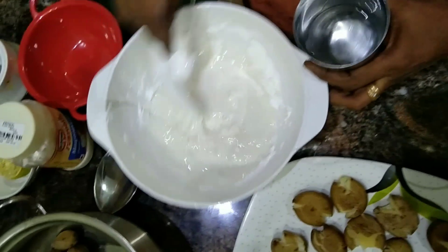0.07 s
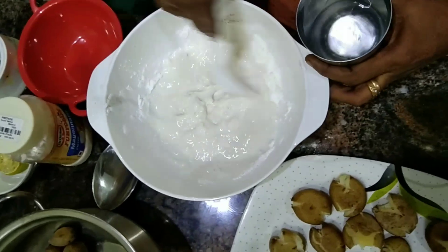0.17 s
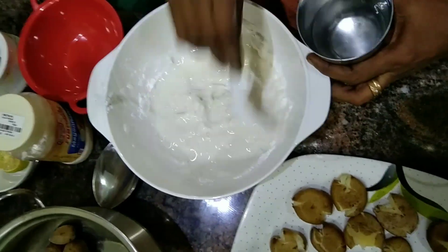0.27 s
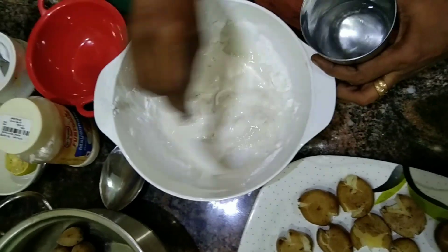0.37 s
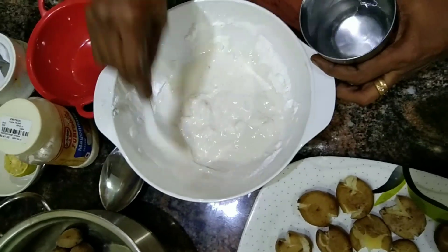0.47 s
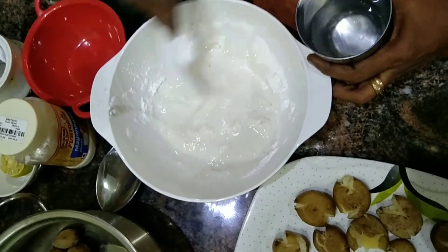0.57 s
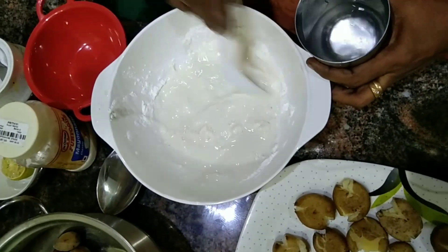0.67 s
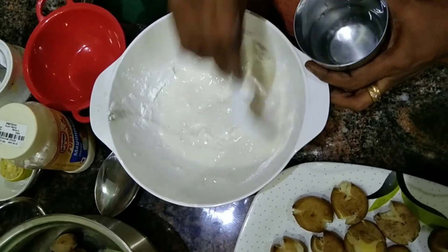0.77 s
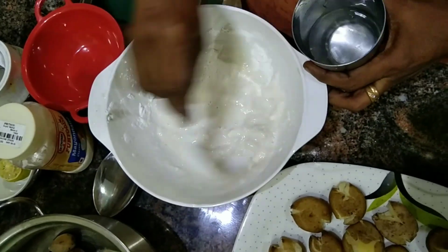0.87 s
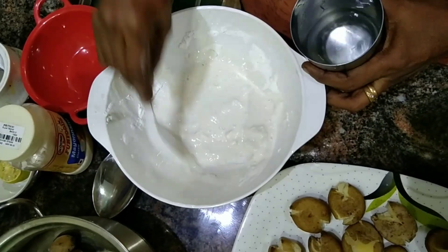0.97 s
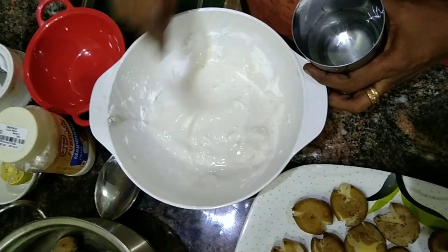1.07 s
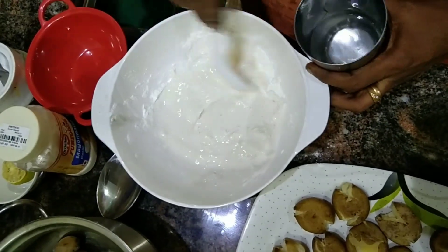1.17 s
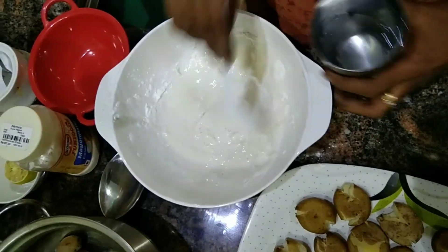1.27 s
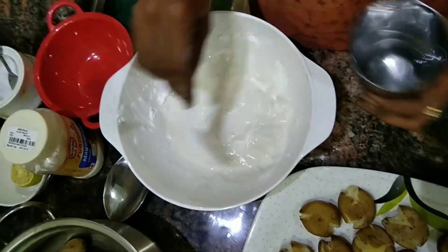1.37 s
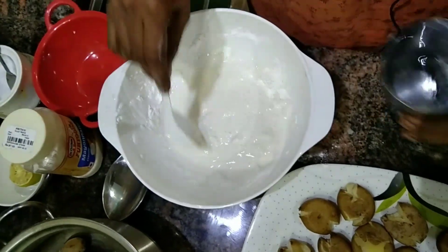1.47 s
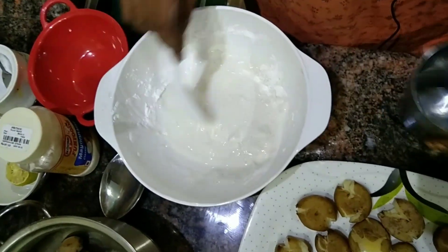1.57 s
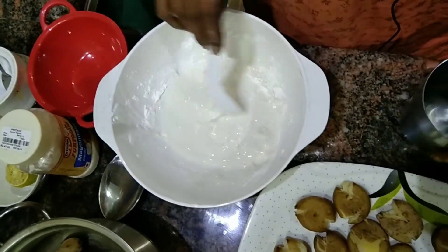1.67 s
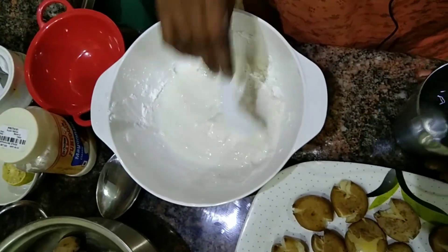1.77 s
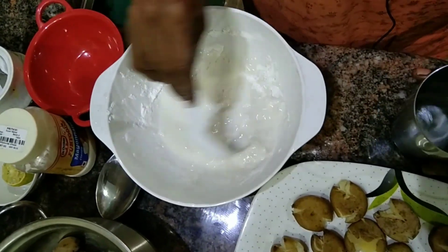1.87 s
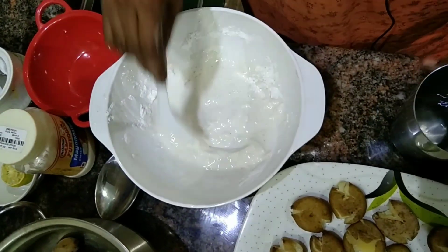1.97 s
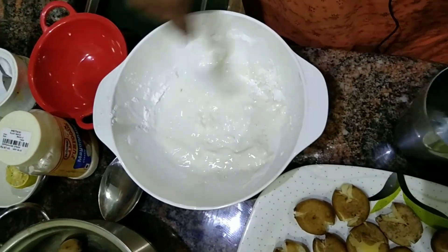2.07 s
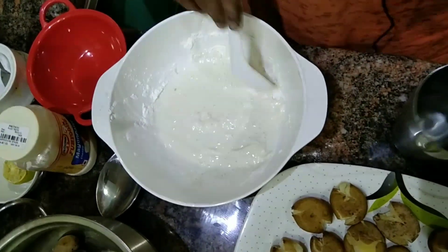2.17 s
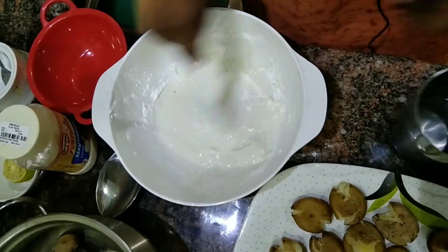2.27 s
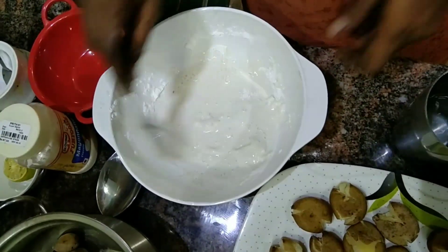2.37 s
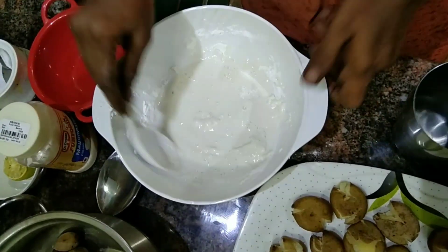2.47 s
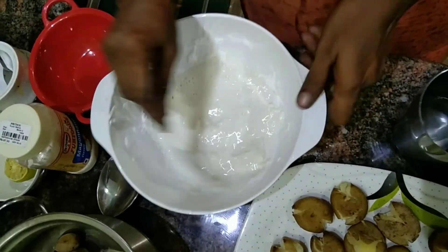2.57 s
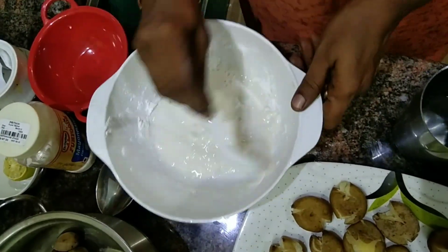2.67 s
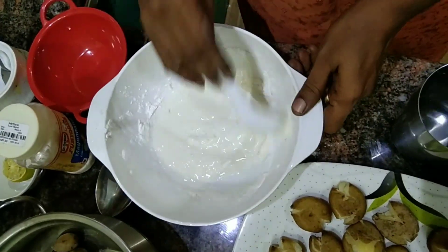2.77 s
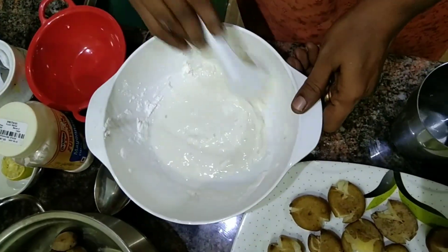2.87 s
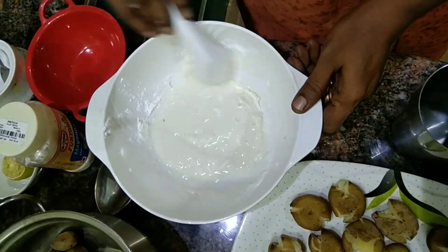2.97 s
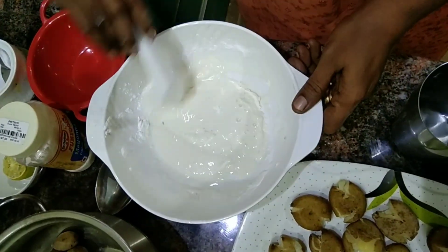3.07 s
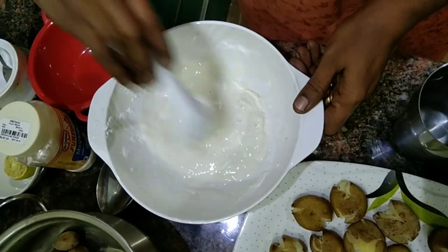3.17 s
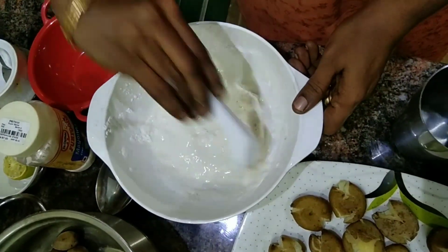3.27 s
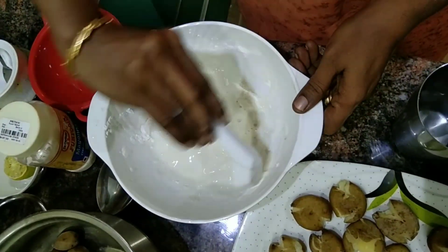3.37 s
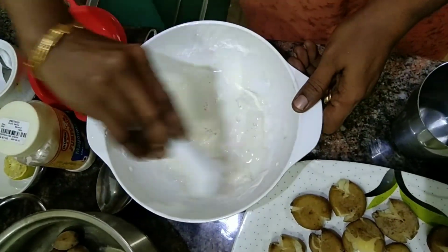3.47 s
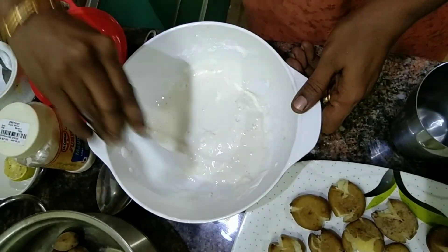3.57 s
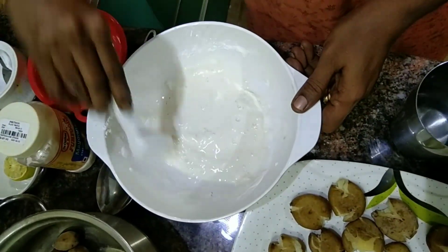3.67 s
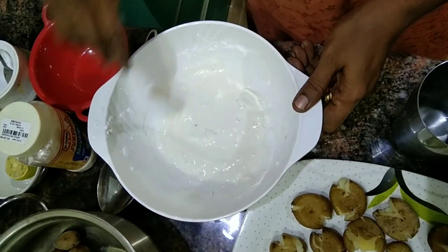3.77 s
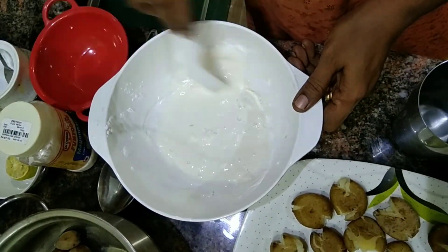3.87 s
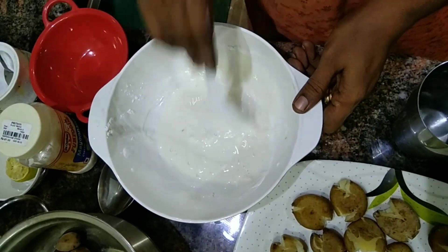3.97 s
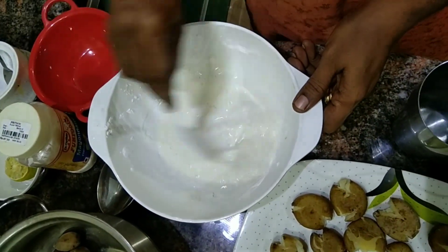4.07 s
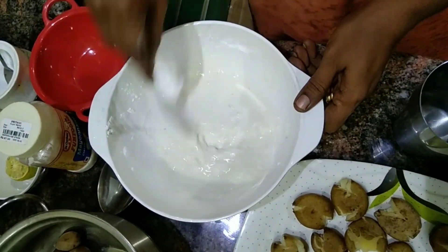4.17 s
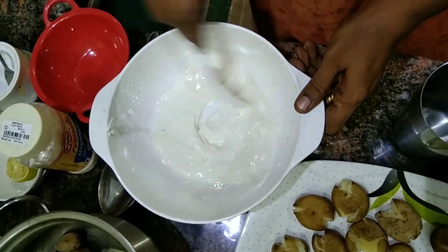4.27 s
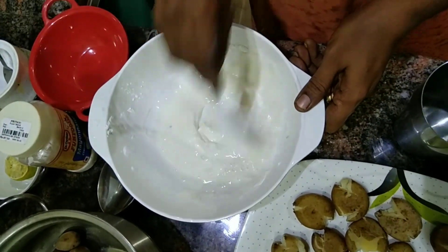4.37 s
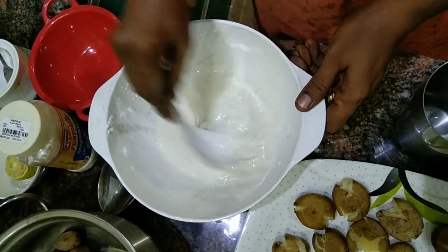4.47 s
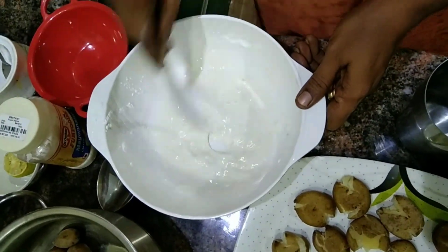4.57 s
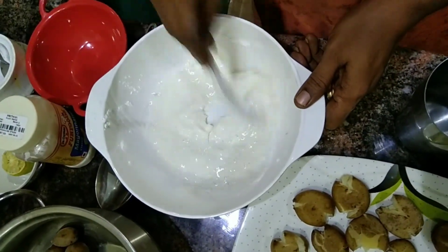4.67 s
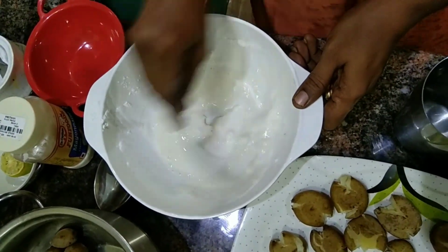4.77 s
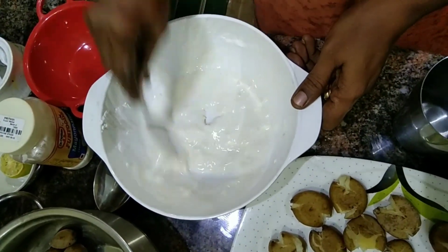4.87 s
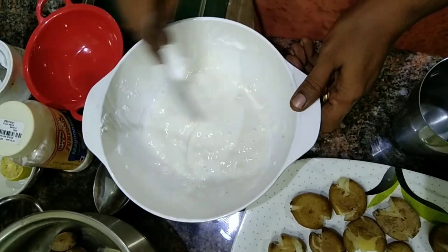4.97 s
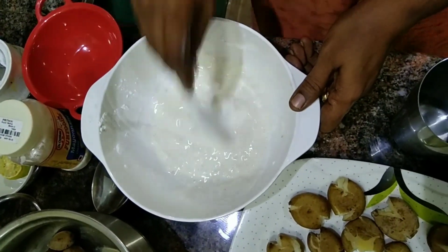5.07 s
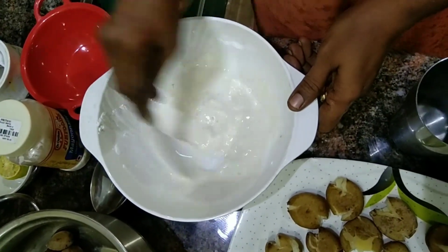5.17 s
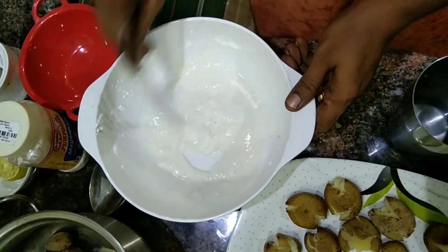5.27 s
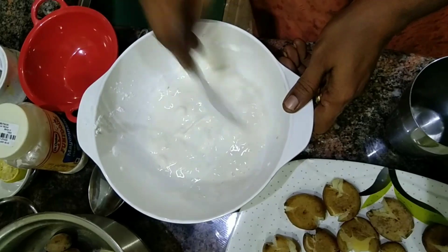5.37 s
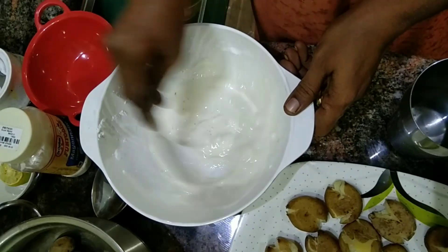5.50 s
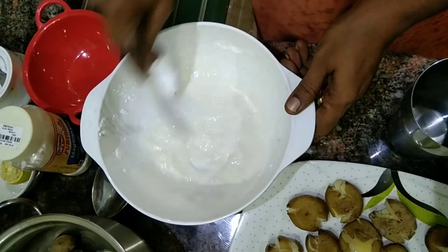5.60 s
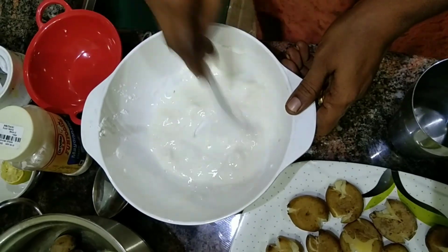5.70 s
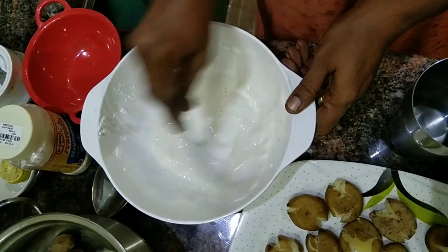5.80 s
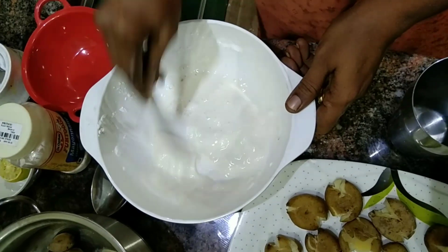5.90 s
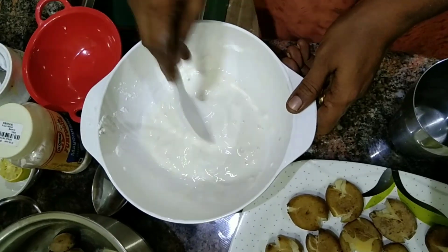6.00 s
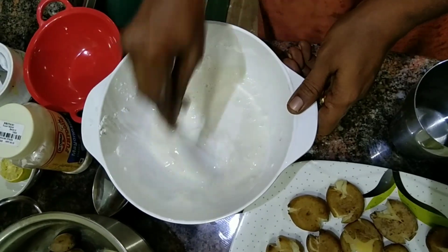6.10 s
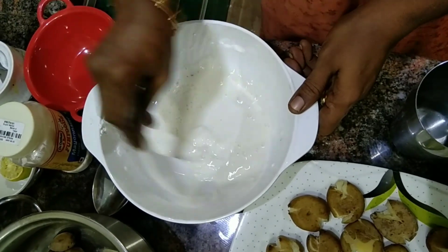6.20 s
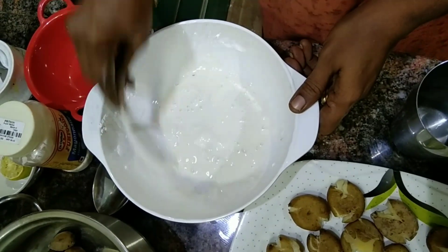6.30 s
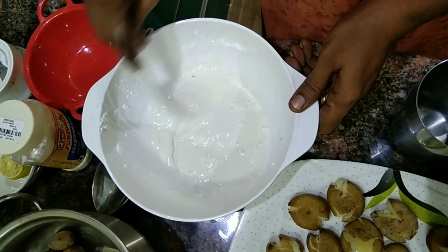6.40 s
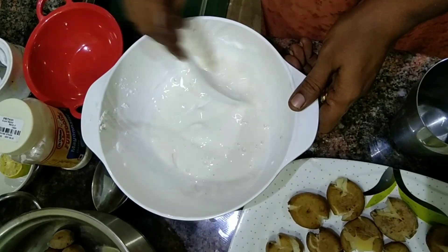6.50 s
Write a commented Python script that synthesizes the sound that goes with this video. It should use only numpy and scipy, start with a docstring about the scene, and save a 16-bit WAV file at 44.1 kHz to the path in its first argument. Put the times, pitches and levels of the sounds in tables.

```python
"""A kitchen hums and a power supply whines near 8 kHz, pulsing at twice the mains frequency: sines over shaped noise.
A plastic spoon stirs thin batter in a plastic bowl on a stone counter: its taps and scrapes excite the bowl's modes,
the batter clicks and slops as chirped pops and patchy noise. A pot is nudged, then a steel cup is set down and clinks:
damped modes plus noise bursts and impulses. Each hit gets a reverberant tail of about half a second."""
import sys
import numpy as np
from scipy import signal
from scipy.fft import rfft, irfft, next_fast_len
from scipy.io import wavfile
from scipy.ndimage import uniform_filter1d, map_coordinates

SR = 44100
rng = np.random.default_rng(int(sys.argv[2]) if len(sys.argv) > 2 else 0)


def inscribe(sig):
    """Save sig as 16-bit PCM at rate SR to the path in sys.argv[1].

    A 1-D sig is mono; a 2-D sig holds one channel per row.
    Samples are clipped to [-1, 1] before scaling.
    """
    pcm = np.round(np.clip(np.atleast_2d(sig).T, -1, 1) * 32767)
    wavfile.write(sys.argv[1], SR, pcm.astype(np.int16))


N = 288414
T = np.arange(N) / SR


def amp(db):
    """dB to amplitude."""
    return 10 ** (np.asarray(db) / 20)


def unit(x):
    """Scales to rms 1."""
    return x / np.sqrt(np.mean(x ** 2) + 1e-20)


def peak(x):
    """Scales to peak 1."""
    return x / np.abs(x).max()


def along(points, hz):
    """Interpolates (Hz, value) points on a log-frequency axis."""
    f, v = np.transpose(points)
    return np.interp(np.log(hz + 1), np.log(f + 1), v)


def wobble(knots_per_s):
    """Smooth random curve through normal-distributed knots."""
    knots = rng.standard_normal(int(N * knots_per_s / SR) + 4)
    return map_coordinates(knots, [T * knots_per_s])


def filtered(x, response):
    """Applies a complex response of frequency to x."""
    m = next_fast_len(x.shape[-1] + 8192)
    spectrum = rfft(x, m) * response(np.fft.rfftfreq(m, 1 / SR))
    return irfft(spectrum, m)[..., :x.shape[-1]]


def noise(spectrum, size=N):
    """Coloured noise, rms 1."""
    return unit(filtered(rng.standard_normal(size), lambda hz: amp(along(spectrum, hz))))


def ringing(modes, t, attack_s):
    """Damped modes (Hz, dB, t60 s), each strength scattered at random, with a soft onset."""
    chance_db = rng.normal(0, 1.5, len(modes))
    total = 0
    for (hz, db, t60_s), scatter_db in zip(modes, chance_db):
        total = total + amp(db + scatter_db - 60 * t / t60_s) * np.sin(2 * np.pi * hz * t)
    return (1 - np.exp(-t / attack_s)) * total


def puff(spectrum, t, t60_s):
    """Decaying burst of coloured noise, peak 1."""
    envelope = amp(-60 * t / t60_s) * (1 - np.exp(-t / 0.001))
    return peak(noise(spectrum, size=len(t)) * envelope)


# room decay: (frequency [Hz], t60 [s])
ROOM_DECAY = [(150, 0.13), (700, 0.65), (2000, 0.41), (6000, 0.44), (14000, 0.61)]


def add(track, start_s, sound, room_db):
    """Mixes in a sound with a fresh noise tail that decays at its own rate per frequency."""
    hz, t, z = signal.stft(rng.standard_normal(SR * 3 // 5), SR, nperseg=256)
    decay = amp(-60 * t / np.abs(along(ROOM_DECAY, hz))[:, None])
    tail = signal.istft(z * decay, SR, nperseg=256)[1]
    wet = amp(room_db) * signal.fftconvolve(sound, tail / np.linalg.norm(tail))
    i = round(start_s * SR)
    track[i:i + len(sound)] += sound[:len(track) - i]
    i += round(.006 * SR)  # the first walls answer a little later
    track[i:i + len(wet)] += wet[:max(len(track) - i, 0)]


# kitchen air spectrum: (frequency [Hz], density [dB per Hz])
AIR_SPECTRUM = [(15, -44.5), (25, -42.5), (48, 5.5), (102, -1), (157, -5), (185, -8), (309, -6.5),
                (489, -10.5), (1130, -17.5), (1940, -20), (2760, -23), (3160, -23.5), (6210, -23),
                (8140, -17), (16000, -33)]
# appliance hum: (frequency [Hz], level before wavering [dB rms])
HUM_TONES = [(55, -86), (107.7, -76.5), (193.8, -71.5)]
# power-supply whine: (frequency [Hz], level before pulsing and wavering [dB rms])
WHINE_TONES = [(7305, -85), (7781, -71), (8257.8, -70.5), (8734, -84)]
AIR_DB, PULSE_HZ = -62, 100.05


def kitchen():
    """Air noise, a wavering hum and a whine switched on at each mains half-wave."""
    air = amp(AIR_DB + 0.23 * wobble(1.64)) * noise(AIR_SPECTRUM)
    hum = np.zeros(N)
    for hz, db in HUM_TONES:
        level = amp(db + 3 + 2.5 * wobble(9))  # +3 dB: rms to peak
        hum += level * np.sin(2 * np.pi * hz * T + 1.6 * wobble(14))
    whine = np.zeros(N)
    for hz, db in WHINE_TONES:
        level = amp(db + 3 + wobble(3))
        whine += level * np.sin(2 * np.pi * hz * T + .7 * wobble(2))
    gate = 1 + 1.05 * np.cos(2 * np.pi * PULSE_HZ * (T - .0035))
    return air + hum + gate * whine


def bubble(t, hz, t60_s, snap_db):
    """An air pocket pops: a damped tone rising as it closes and a snap around it, the harder the broader."""
    onset = 1 - np.exp(-t / 0.0015)
    tone = np.sin(2 * np.pi * hz * t * (1 + 5 * t)) * amp(-60 * t / max(t60_s, .002)) * onset
    edge = [(hz / 6, -45), (hz / 1.6, -4), (hz, 0), (1.8 * hz, -4),
            (3.2 * hz, 1.5 * snap_db - 14), (10 * hz, 3 * snap_db - 36)]
    # the microphone dulls the top of each snap
    snap = filtered(puff(edge, t, 0.0071), lambda f: 1 / (1 + 1j * f / 9000) ** 2)
    return tone + amp(snap_db) * snap


# wet clicks: (time [s], level [dB], pitch [Hz], snap against tone [dB])
BATTER_CLICKS = [(0.063, -47, 11500, 11), (0.0722, -43.5, 1300, -0.5), (0.141, -40, 2100, 1.5),
                 (0.365, -55, 2885, 8), (0.3887, -47, 2800, -2), (0.425, -48, 4048, -4),
                 (0.472, -43.5, 1470, 0), (0.7221, -41, 5100, 9), (0.817, -40, 10000, -5),
                 (0.91, -43, 2690, 6), (0.9676, -44.5, 4240, -4.3), (1.0443, -49, 1380, -17),
                 (1.205, -42, 2260, -10), (1.2626, -51, 2230, 2), (1.2735, -45, 5650, -1),
                 (1.3338, -46.5, 4130, 2), (1.3702, -47.5, 6244, 5), (2.0799, -48.5, 6700, 2),
                 (2.134, -46.5, 7060, 4), (2.382, -52, 1450, 5), (2.4449, -50, 7600, 9.5),
                 (3.164, -48, 1950, -1), (3.3324, -41, 2720, -11.5), (3.5252, -48, 4890, 7.5),
                 (3.549, -33.5, 9250, 3.5), (3.5606, -42.5, 4900, 3), (4.2096, -41, 1560, -8),
                 (4.2977, -44, 2110, 0), (4.3277, -51, 2100, 4), (4.395, -27.5, 3830, -14),
                 (4.408, -44, 4200, 6), (4.7492, -42, 2070, -19), (4.7634, -43, 4000, 8),
                 (4.8273, -51, 1880, -9), (4.8399, -42.5, 2120, 1.5), (4.901, -46.5, 1520, 0),
                 (5.003, -49, 3020, -3), (5.0236, -52, 1520, -2), (5.1462, -50, 2420, -4),
                 (5.2161, -43, 2400, 10.5), (5.285, -44.5, 1540, 3), (5.3445, -43, 5100, 8),
                 (5.438, -46, 3870, 5), (5.5064, -35, 2570, -5), (5.515, -44, 2713, 10),
                 (5.539, -37.5, 4870, 3), (5.5705, -34, 5540, -3), (5.5817, -42, 1530, 6),
                 (5.6824, -48, 3000, -1), (5.755, -40.5, 1440, 2), (5.8126, -19.5, 2610, -5.5),
                 (5.8216, -29, 3110, -10), (5.8333, -41, 3488, -13), (5.849, -26, 6440, -2),
                 (5.925, -47, 1420, -2), (6.0303, -36.5, 10500, 4), (6.0419, -35.5, 2140, -2),
                 (6.2104, -50.5, 1530, 6.5), (6.2524, -55.5, 1380, 9)]
POP_T60_S, POP_SHORTENS = 0.019, 0.69  # t60 at 2 kHz; falls with this power of pitch


def clicks():
    """The batter's loudest pops, each a closing air pocket."""
    out, t = np.zeros(N), np.arange(SR // 16) / SR
    for start_s, db, hz, snap_db in BATTER_CLICKS:
        t60_s = POP_T60_S * (2000 / hz) ** POP_SHORTENS
        add(out, start_s, amp(db) * bubble(t, hz, t60_s, snap_db), room_db=-10.5)
    return out


# bowl modes: (frequency [Hz], width [Hz], level [dB])
BOWL_MODES = [(494.4, 55.5, 3), (592, 59, 5), (672.3, 70, 10.5), (800, 31.8, -2), (860.5, 40.3, 4.5),
              (894, 37, -6), (1013, 28, -10), (1426, 53, 1.5), (1990, 230, -9)]
# spoon on bowl: (time [s], body peak [dB], spot pitch [Hz], hardness: click against body [dB])
SPOON_TAPS = [(0.066, -37.5, 830, -10.5), (0.128, -29.5, 620, -28), (0.14, -39, 660, -34),
              (0.383, -39, 660, -32), (0.399, -52, 610, -13), (0.583, -45, 635, -27),
              (0.791, -45.5, 700, -14), (0.91, -50, 680, -21), (0.954, -40, 690, -24),
              (1.086, -49, 678, -22), (2.651, -13, 890, -6.5), (2.667, -11.5, 610, -10.5),
              (2.682, -20.5, 614, -18), (3.497, -47.5, 680, -30), (3.522, -40.5, 686, -26),
              (3.554, -46.5, 700, 1.5), (3.719, -34, 864, -14), (3.727, -25.5, 940, -10.5),
              (3.739, -24.5, 670, 4), (3.751, -34, 633, 16), (3.76, -21, 990, -1.5), (3.901, -33, 970, -24),
              (3.924, -34, 830, -29), (4.281, -31, 600, -23), (4.65, -45, 673, -10), (4.844, -45, 676, -16),
              (4.95, -35.5, 690, -29), (5.347, -44, 660, -10), (5.782, -34, 700, -23),
              (6.04, -37.5, 562, -12)]
# bowl base rocking on the counter: (time [s], level [dB])
BASE_ROCKS = [(0.128, -49), (0.383, -54), (0.954, -55), (2.651, -23.5), (4.281, -64), (4.651, -50),
              (4.95, -55)]
CLICK_T60_S, KNOCK_T60_S = .018, .03
KNOCK_DB = -0.5  # mid part of a hard contact, against its click


def taps():
    """A soft push rings the batter-damped bowl, most near the spot's pitch; harder contact adds a click."""
    out, t = np.zeros(N), np.arange(SR // 8) / SR
    knock_spectrum = [(250, -98), (600, -2), (1100, -5.5), (1500, -16.5), (2500, -19), (3500, -20), (8000, -66)]
    click_spectrum = [(1500, -16), (3800, 4), (8000, 3.0), (12000, -14.0), (16000, -41)]
    for start_s, db, spot_hz, hard_db in SPOON_TAPS:
        modes = []
        for hz, width_hz, level_db in BOWL_MODES:
            off_spot_db = 12 * abs(np.log2(hz / spot_hz))
            modes.append((hz, level_db - off_spot_db, 2.2 / width_hz))  # t60 = 2.2 / width
        body = peak(ringing(modes, t, 0.002))
        knock = amp(hard_db + KNOCK_DB) * puff(knock_spectrum, t, KNOCK_T60_S)
        click = amp(hard_db) * puff(click_spectrum, t, CLICK_T60_S)
        add(out, start_s, amp(db) * (body + knock + click), room_db=-7)
    for start_s, db in BASE_ROCKS:
        boom = amp(db - 60 * t / 0.027) * np.sin(2 * np.pi * 250 * t)
        boom *= 1 + 0.25 * np.cos(2 * np.pi * 70 * t)  # makes three low tones
        add(out, start_s, boom, room_db=-5)
    return out


def bowl_response(f):
    """The bowl's causal response: resonances of alternating sign."""
    total = 0
    for k, (hz, width_hz, db) in enumerate(BOWL_MODES):
        total = total + (-1) ** k * amp(db) * 1j * f * width_hz / (hz * hz - f * f + 1j * f * width_hz)
    return total


def grains(count, hz, spread, cycles, size_db):
    """Many tiny damped pops at random moments around a pitch curve, rms 1."""
    u, t = rng.random((count, 2)), np.arange(512) / SR
    start = (u[:, :1] * N).astype(int)
    f = np.clip(hz[start] * np.exp(spread * rng.standard_normal((count, 1))), 300, 15000)
    life = t * f / cycles
    size = amp(-size_db * np.log(u[:, 1:] + .02))  # the offset caps the largest pops
    pops = size * np.sin(2 * np.pi * f * t) * life * np.exp(-life)
    return unit(np.bincount((start + np.arange(512)).ravel(), pops.ravel(), N + 512)[:N])


def patchy(spectrum, depth_db, bins, frames):
    """Coloured noise whose level comes in small patches of time and pitch, rms 1."""
    z = signal.stft(noise(spectrum), nperseg=256)[2]
    field = uniform_filter1d(rng.standard_normal(z.shape), size=bins, axis=0)
    field = uniform_filter1d(field, size=frames, axis=1)
    return unit(signal.istft(z * amp(depth_db * unit(field)), nperseg=256)[1][:N])


# spoon sweeps: (start [s], hold [s], slop level [dB], wall rub level [dB], air pocket pitch [Hz])
SPOON_STROKES = [(0.1, 0.037, -66.5, -67, 3700), (0.357, 0.018, -65, -63, 6070),
                 (0.638, 0.15, -69.5, -66.5, 4550), (0.79, 0.094, -89, -74, 5830),
                 (0.93, 0.057, -76, -63, 5080), (1.101, 0.053, -60.5, -63.5, 2615),
                 (2.67, 0.23, -80, -52, 5740), (2.858, 0.2, -66.5, -58.5, 6040),
                 (3.466, 0.042, -72, -59.5, 2265), (3.54, 0.04, -65.5, -78, 5700),
                 (3.665, 0.027, -55, -55, 4680), (3.75, 0.12, -63, -49.5, 6150),
                 (3.896, 0.065, -77, -54.5, 4200), (4.274, 0.04, -61, -70, 6000),
                 (4.373, 0.033, -67.5, -79, 4240), (4.631, 0.12, -64, -69, 4780),
                 (4.819, 0.05, -62.5, -60, 3300), (4.95, 0.096, -67, -62.5, 4930),
                 (5.16, 0.12, -72.5, -67, 2170), (5.308, 0.057, -62.5, -65.5, 5900),
                 (5.395, 0.09, -66, -67.5, 3900), (5.514, 0.18, -62.5, -63, 5970),
                 (5.696, 0.032, -55, -62, 4980), (5.774, 0.073, -62.5, -60, 2890),
                 (5.879, 0.061, -65.5, -61.5, 2710), (6.02, 0.031, -73, -59.5, 2670),
                 (6.168, 0.066, -75, -63.5, 2820), (6.42, 0.059, -59.5, -64, 4200)]
ATTACK_S, SLOP_T60_S, RUB_T60_S = 0.036, 0.23, 0.24


def sweeps(level_db, t60_s):
    """Gain of all sweeps, power-summed: attack, hold, release."""
    start, hold = np.transpose(SPOON_STROKES)[:2, :, None]
    age = T[::64] - start
    release_s = np.clip(age - ATTACK_S - hold, 0, 1)
    gain = np.clip(age / ATTACK_S, 0, 1) * amp(level_db[:, None] - 60 * release_s / t60_s)
    return np.interp(T, T[::64], np.sqrt(np.sum(gain ** 2, axis=0)))


# batter slop spectrum: (frequency [Hz], density [dB per Hz])
SLOP_SPECTRUM = [(500, -79), (1300, -3.5), (2300, 3), (4500, 3), (7000, -4), (10000, -34.5)]
# batter fizz spectrum: (frequency [Hz], density [dB per Hz])
FIZZ_SPECTRUM = [(4000, -8), (7000, 12.5), (10000, 10.5), (13000, -2), (16000, -46)]
FIZZ_DB, FIZZ_DB_PER_OCTAVE = -2, 2  # fizz against slop at a 4 kHz pocket; finer pockets fizz more
SINK_OCTAVES_PER_S, GRIT_DB = 4.17, 4  # pockets grow and drop in pitch; the drag is uneven


def stroke():
    """The spoon rubs the wall, which sings in its modes, and drags the batter into slop and fine fizz."""
    start, hold, slop_db, rub_db, hz = np.transpose(SPOON_STROKES)
    fizz_db = slop_db + FIZZ_DB + FIZZ_DB_PER_OCTAVE * np.log2(hz / 4000)
    now = np.maximum(np.searchsorted(start, T) - 1, 0)  # latest sweep
    past_middle_s = np.clip(T - (start + ATTACK_S + hold / 2)[now], -.1, .1)
    pocket_hz = hz[now] * 2 ** (-SINK_OCTAVES_PER_S * past_middle_s)
    rub = unit(filtered(amp(2.4 * wobble(40)) * rng.standard_normal(N), bowl_response))
    # air pockets squeezed behind the blade
    gurgle = grains(count=5000, hz=pocket_hz, spread=.15, cycles=6, size_db=3)
    crackle = grains(count=900, hz=3800 + 0 * T, spread=.5, cycles=.9, size_db=3)
    slop = patchy(SLOP_SPECTRUM, depth_db=3.5, bins=3, frames=5) + 1.1 * gurgle + .55 * crackle
    slop = unit(amp(GRIT_DB * wobble(45)) * slop)
    fine_pops = grains(count=2000, hz=9000 + 0 * T, spread=.3, cycles=1.4, size_db=3)
    fizz = unit(patchy(FIZZ_SPECTRUM, depth_db=2.5, bins=5, frames=4) + .4 * fine_pops)
    wall = sweeps(rub_db, RUB_T60_S) * rub
    batter = sweeps(slop_db, SLOP_T60_S) * slop + sweeps(fizz_db, SLOP_T60_S) * fizz
    return wall + batter


# pot nudge: (time [s], body peak [dB])
POT_NUDGES = [(1.56, -18.5)]
# pot body modes: (frequency [Hz], level [dB], t60 [s])
POT_MODES = [(467, -18, 0.17), (569, 2, 0.039), (615, -1, 0.076), (686, -23, 0.04), (866, -19, 0.13),
             (965, 1, 0.03), (1043, -8, 0.07), (1201, -13, 0.077), (1330, -18, 0.058)]
# pot's thin rim modes: (frequency [Hz], level [dB], t60 [s])
RIM_MODES = [(3290, -6, .15), (5535, -5, .6), (5560, -6, .5), (9420, -6, .25), (9540, 0, .5),
             (9680, -4, .3)]


def pot():
    """A heavier pot is nudged: body modes, a noise tick and a faint ring of the thin rim."""
    out, t = np.zeros(N), np.arange(SR // 2) / SR
    tick_spectrum = [(1000, -10.5), (2200, 0), (4000, -22), (9500, -8.0), (14000, -28.0)]
    for start_s, db in POT_NUDGES:
        tick = amp(-21.5) * puff(tick_spectrum, t, 0.069)
        body = peak(ringing(POT_MODES, t, 0.0019))
        add(out, start_s, amp(db) * (body + tick), room_db=-6.0)
        add(out, start_s, amp(db - 45) * ringing(RIM_MODES, t, 0.0023), room_db=-1)
    return out


SMEAR_S = .004  # random delay per pitch spreads the crack over a few milliseconds


def crack(spectrum, t):
    """A hard minimum-phase impulse of this colour, each pitch delayed at random by up to SMEAR_S; peak 1."""
    cepstrum = irfft(np.log(amp(along(spectrum, np.fft.rfftfreq(4096, 1 / SR)))))
    cepstrum[1:2048] *= 2  # folded: all sound follows the contact
    cepstrum[2049:] = 0
    delay_s = SMEAR_S * np.interp(np.arange(2049), np.linspace(0, 2048, 40), rng.random(40) ** 2)
    late = np.exp(-2j * np.pi * np.cumsum(delay_s) * SR / 4096)
    impulse = irfft(np.exp(rfft(cepstrum)) * late)[:2048]
    return peak(np.pad(impulse, (0, len(t) - 2048)))


# cup on counter: (time [s], clack peak [dB]; against it: thud [dB], brightness [dB], ring [dB])
CUP_HITS = [(2.221, -16, -6, -11, -29.5), (2.4957, -10, -5.5, -3, -13.5)]
# steel cup modes: (frequency [Hz], level [dB], t60 [s])
CUP_MODES = [(1611, 0, .3), (2160, -12, .4), (2326, -12, .35), (2708, -8, .2), (2924, -8, .33),
             (3467, -26, .25), (4958, -27, .22), (7041, -32, .25)]
# stone counter modes: (frequency [Hz], level [dB], t60 [s])
COUNTER_MODES = [(342, -21, .03), (525, -1, 0.017), (580, -6.5, 0.063), (722, -4, 0.032), (840, 5.5, 0.028),
                 (940, -7, .025)]
# steel on stone, low part: (frequency [Hz], density [dB per Hz])
CLACK_SPECTRUM = [(500, -43.5), (1000, -7.5), (1250, -6.5), (1500, 2.5), (1850, -5.5), (2250, -3.5),
                  (3100, -8), (3600, -21), (5000, -63)]
# steel on stone, bright part: (frequency [Hz], density [dB per Hz])
BRIGHT_SPECTRUM = [(2500, -69), (3700, -15.5), (4300, 0.5), (5300, 1.5), (5850, -9.5), (7000, -1.5),
                   (9500, -11.5), (13000, -23.5), (16000, -52.5)]


def cup():
    """Steel on stone: a clack, the counter's thud and the ringing cup wall."""
    out, t = np.zeros(N), np.arange(SR // 2) / SR
    for start_s, db, thud_db, bright_db, ring_db in CUP_HITS:
        thud = amp(thud_db) * peak(ringing(COUNTER_MODES, t, 0.0013))
        add(out, start_s, amp(db) * (crack(CLACK_SPECTRUM, t) + thud), room_db=-6)
        bright = crack(BRIGHT_SPECTRUM, t) + 0.67 * puff(BRIGHT_SPECTRUM, t, 0.044)
        add(out, start_s, amp(db + bright_db) * bright, room_db=-6.5)
        add(out, start_s, amp(db + ring_db) * ringing(CUP_MODES, t, 0.00075), room_db=-15)
    return out


# faint tone path: (time [s], frequency [Hz], level before a 6 dB lift [dB])
FAR_TONE_PATH = [(4.25, 2170, -80), (4.45, 2210, -85), (4.62, 2125, -78.5), (4.899, 2120, -80),
                 (5.08, 2076, -84), (5.15, 2080, -98)]


def far_tone():
    """A faint thin tone drifts by: a sine with gliding pitch and wavering level."""
    s, hz, db = np.transpose(FAR_TONE_PATH)
    heard = (T > s[0]) & (T < s[-1])
    level = amp(np.interp(T, s, db) + 6.0 + 3.0 * wobble(15))
    return heard * level * np.sin(2 * np.pi * np.cumsum(np.interp(T, s, hz)) / SR)


# treble haze under mid: (frequency [Hz], level [dB])
HAZE_LEVEL = [(3500, -70), (4500, -26), (9000, -20), (14000, -9)]


def scene():
    """Nearly mono, with a faint treble haze differing between left and right."""
    mid = kitchen() + clicks() + taps() + stroke() + pot() + cup() + far_tone()
    scatter = rng.standard_normal(2048) * np.exp(-np.arange(2048) / 500)
    haze = signal.fftconvolve(np.pad(mid, (64, 0)), scatter / np.linalg.norm(scatter))[:N]
    haze = filtered(haze, lambda hz: amp(along(HAZE_LEVEL, hz)))
    return np.array([mid + haze, mid - haze])


TOP_HZ, BASS_CUT_HZ = 15750, 35


def record(dry):
    """The camera cuts the deepest bass and keeps nothing above its band limit."""
    return filtered(dry, lambda hz: (hz < TOP_HZ) * hz ** 2 / (hz ** 2 + BASS_CUT_HZ ** 2))


dry = scene()
out = record(dry)
inscribe(out)
```